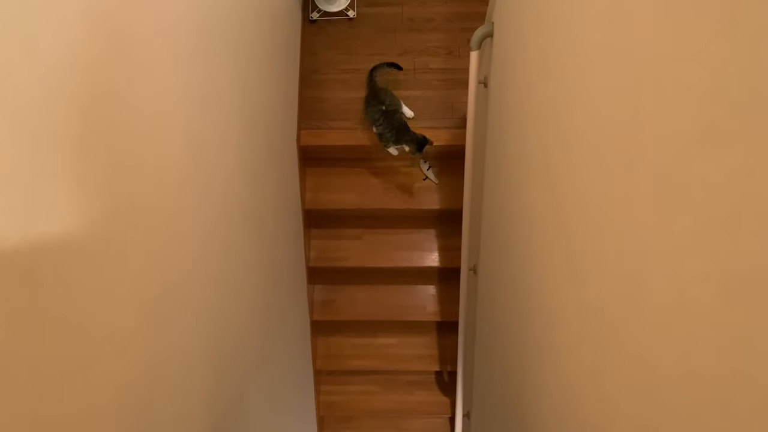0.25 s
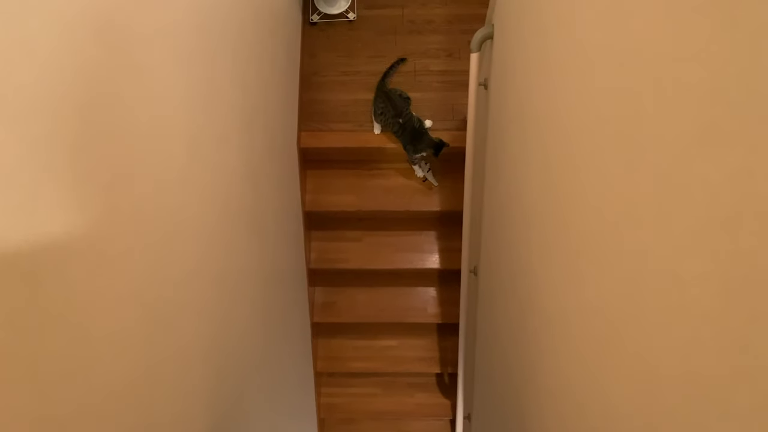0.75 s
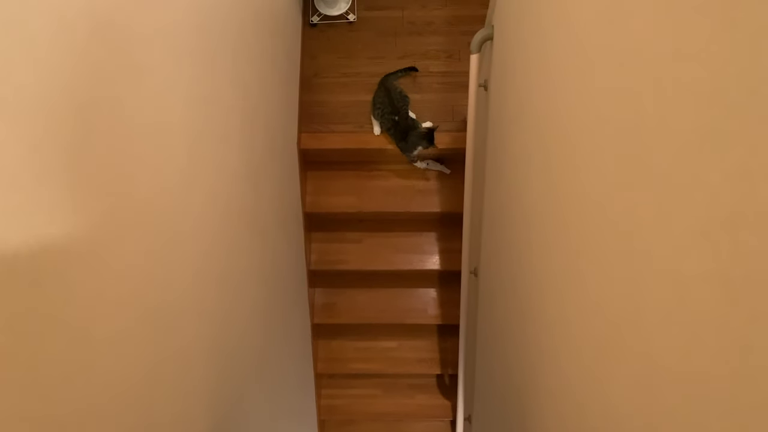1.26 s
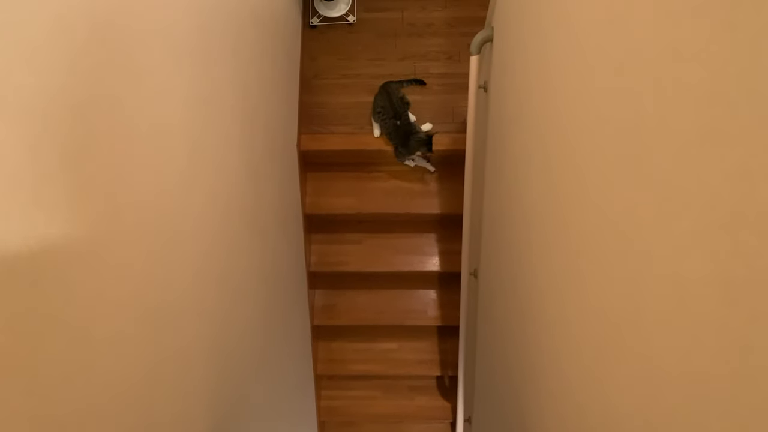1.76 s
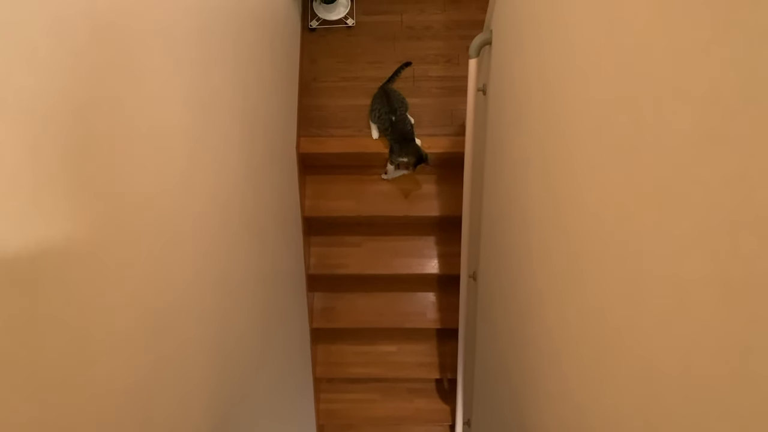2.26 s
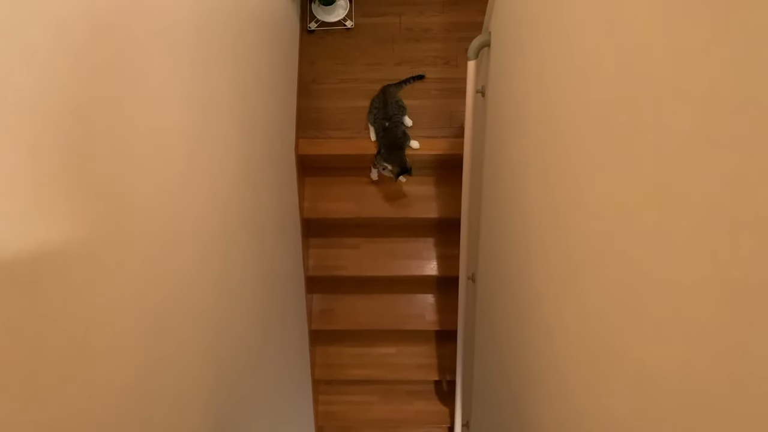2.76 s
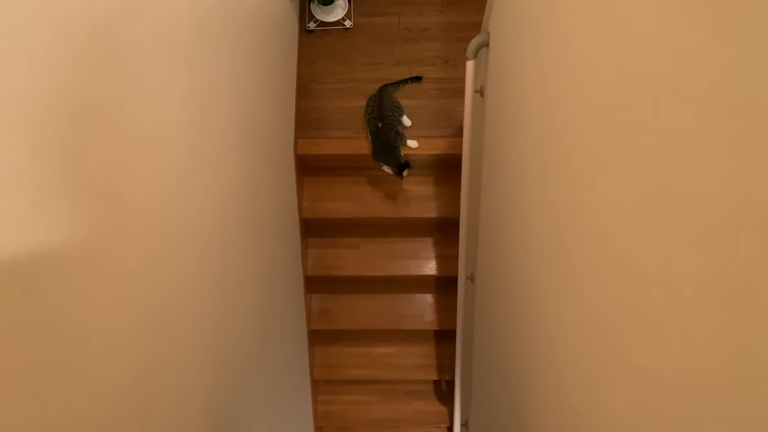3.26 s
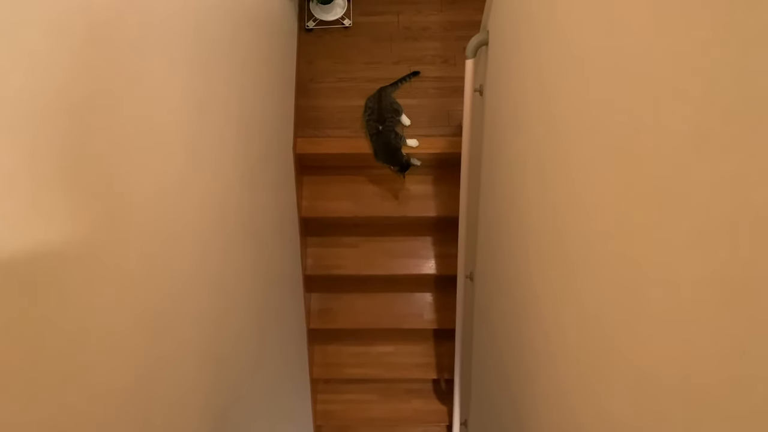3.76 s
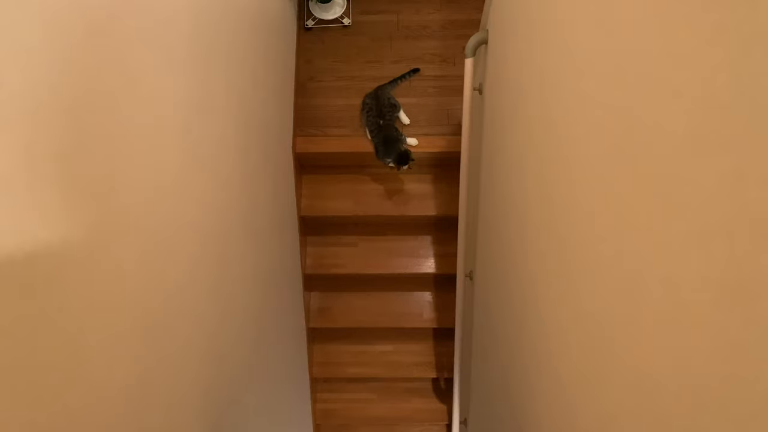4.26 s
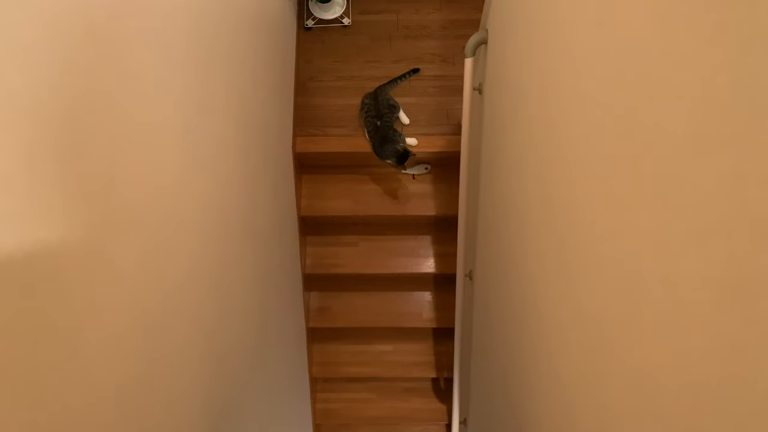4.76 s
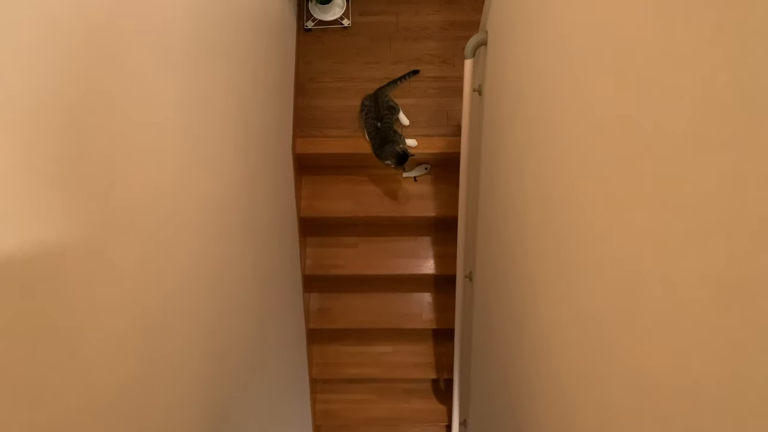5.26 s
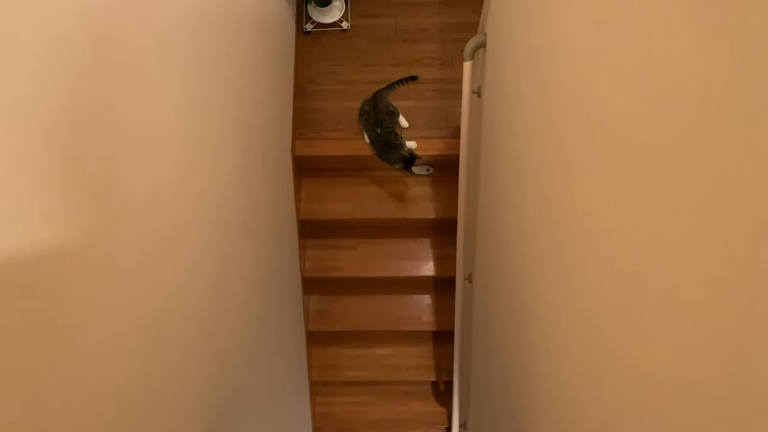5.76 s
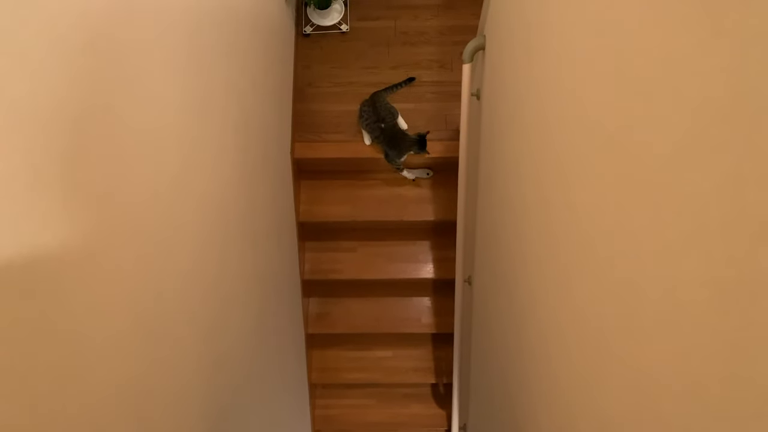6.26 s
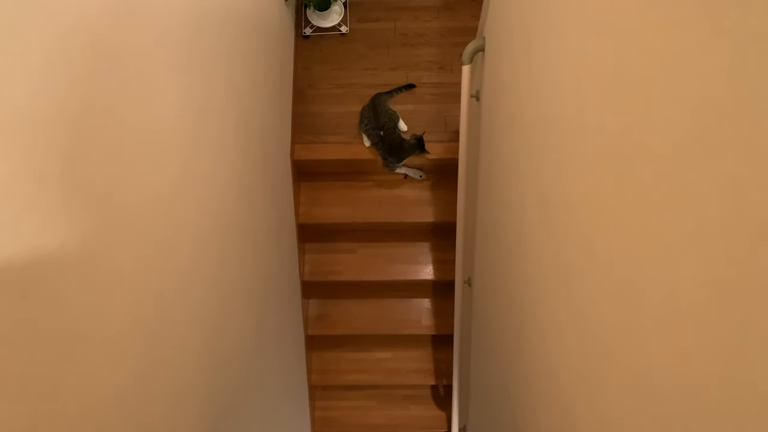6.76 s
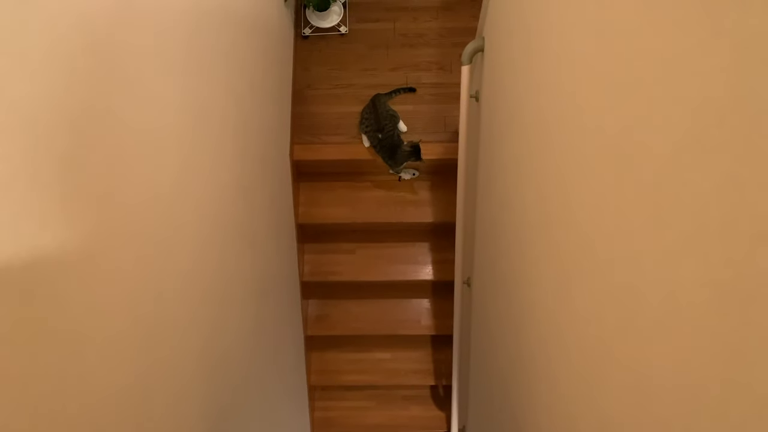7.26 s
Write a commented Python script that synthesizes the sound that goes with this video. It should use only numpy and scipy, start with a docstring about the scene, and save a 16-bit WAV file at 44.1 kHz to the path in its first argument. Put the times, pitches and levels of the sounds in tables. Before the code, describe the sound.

Quiet indoor air with a faint, low, wavering hum, heard from above a bare wooden stairwell. A soft low thump comes at 0.1 seconds, then a firmer hollow thump at 0.7 and a sharp toy clack at 0.8. The loudest, brightest clack cracks at 1.4, with an echo dying in about half a second. Dull taps and a slight scrape around 2.0 lead to a quick cluster of small knocks at 2.25 to 2.35, then lighter taps at 2.8 and 2.95. From 3.1 to 4.4 there are mostly faint rustling rubs, a slight slide and muffled bumps. A crisp knock lands at 4.8, followed by near quiet. A tight double clack comes at 5.85 to 5.97, strong and ringing, then moderate knocks at 6.5, 6.65 and 7.1, a faint dull tap at 7.3 and a last tiny rub.

```python
"""Hard clacks stand out over dull thumps and faint sliding: a cat bats a small hard toy about the top of
a wooden staircase, with the microphones above. Short chatters of contact ring the toy, and dull pushes
ring the modes of the hollow treads. Friction noise makes the toy slide, scrape and rustle.
The bare stairwell adds dense echoes to it all, over quiet air and the faint hum of an appliance."""
import sys
import numpy as np
from scipy import signal
from scipy.fft import rfft, irfft, next_fast_len
from scipy.io import wavfile
from scipy.ndimage import uniform_filter1d

SR = 44100
rng = np.random.default_rng(int(sys.argv[2]) if len(sys.argv) > 2 else 0)


def waveform_to_disk(signal):
    """Save audio, clipped to [-1, 1], as 16-bit WAV at the path in sys.argv[1]."""
    frames = np.transpose(np.atleast_2d(signal))
    scaled = np.clip(frames, -1, 1) * 32767
    samples = np.round(scaled).astype(np.int16)
    wavfile.write(sys.argv[1], SR, samples)


N = 331102  # length in samples

# The toy strikes the wood. Each row: start in seconds, relative level in dB, hardness in dB,
# hollowness in dB, contact time in seconds, favoured ring in Hz, lift of that ring in dB,
# room send in dB, relative level of the tread's answer in dB, depth of that answer in dB.
TOY_STRIKES = [(0.772, -25, -8, -10.5, 0.0018, 2480, 3, -1, -32.5, -10),
               (0.949, -40.5, -15.5, 12, 0.0017, 1255, 12, -2, -41, 7),
               (0.988, -56.5, -7.5, -12, .0025, 1370, -8, -2, -39.5, -1),
               (1.4194, -19, -7.5, -2, .0014, 1380, 1.5, -2, -26, -6.5),
               (1.637, -47, -10, 12, 0.0017, 1320, 7, -5, -35.5, -2),
               (2.016, -53, -13, 13.5, 0.0028, 1580, 0.5, 5, -49, 3),
               (2.119, -52.5, -41, 13, 0.0015, 1284, 5, -2, -66, -2),
               (2.227, -48, -12.5, -1, 0.0022, 1860, 1.5, 4, -53, 1),
               (2.255, -50, -8.5, -5, 0.0022, 1880, 6, 6, -60, -2),
               (2.2642, -33, -2, -6, 0.0024, 1910, 4, -1.5, -48, 0),
               (2.284, -39, -25, -15, 0.0022, 1940, 11, -8, -49, 5),
               (2.331, -30, -30.5, 0.5, 0.0016, 1980, 6, -3, -44.5, 0),
               (2.342, -42, -34, 10.5, 0.0012, 1625, 16, 1, -48.5, 5),
               (2.704, -58.5, -7, 11, 0.0041, 1480, 1.5, 1.5, -50, 1),
               (2.73, -47.5, -42.5, -4.5, .0018, 1400, 3, 4, -48.5, 0),
               (2.803, -32, -16, 9.5, 0.002, 1350, 0, 0, -44.5, 0),
               (2.951, -36, -17, 2, 0.0043, 2460, 4, -0.5, -42, -3),
               (3.462, -62, -6, 18.5, 0.0023, 1300, 5.5, -1.5, -47, 2),
               (3.553, -62, -8.5, 3, 0.0018, 1195, 13.5, 4, -70, -6),
               (4.021, -67, -17, 4.5, .0031, 1240, -1, 0, -70.5, 0.5),
               (4.639, -67, -13.5, 20.5, .005, 1150, 7, 0.5, -61.5, 1.5),
               (4.821, -34, -2.5, -1.5, 0.0016, 1870, 6, .5, -32.5, 6.5),
               (5.839, -46, -10.5, 1, 0.0031, 1320, 8, 3.5, -36.5, 0),
               (5.861, -32.5, -27, 2, 0.00095, 1490, 3, -0.5, -33, 0),
               (5.8649, -33, -2.5, 6.5, 0.0018, 2060, 3.5, -1.5, -26.5, -7),
               (5.9648, -22.5, -12, 3.5, 0.0025, 1556, 10.5, -3, -34, -8),
               (5.975, -30.5, -16, 8.5, 0.00091, 2280, 21, -5, -30, -10),
               (6.471, -35.5, -3.5, -9, 0.0017, 1450, 0, 2, -34.5, -4),
               (6.637, -38.5, -22, -5.5, 0.0023, 2280, 5, -6, -38, 4.5),
               (6.65, -39, -2.5, 9, 0.0011, 2250, 12.5, 0.5, -25.5, -5),
               (7.1209, -32.5, -5.5, -5.5, 0.002, 2400, 8, .5, -35.5, -5),
               (7.294, -51, -33, 10.5, 0.0055, 1190, 3, -5, -59.5, -1)]
# Resonances of the toy before each grip shifts them. Each row: centre in Hz, width in Hz, lift in dB.
TOY_RINGS = [(1331, 60, 4), (1455, 60, 3.5), (1590, 80, 3), (1785, 45, 3), (1875, 50, 6), (2235, 55, 5.5),
             (2401, 55, 6), (2590, 55, 7.5), (2745, 40, 7.5), (2950, 50, 3), (4570, 300, 5), (5100, 200, 3),
             (5380, 120, 4), (5550, 50, 5), (6330, 100, 4), (6757, 60, 8), (9300, 900, 3)]
# Broad colour of a clack. Each row: frequency in Hz, relative density in dB per Hz.
CLACK_COLOUR = [(150, -22.5), (400, -7.5), (570, -6.5), (700, -8.5), (950, -7), (1300, 1.5), (2500, -4.5),
                (3350, -2), (4000, 6), (5500, 1), (6800, 3), (7700, 4.5), (9000, 4.5), (10000, 3.5),
                (12000, 9), (13300, 0.5), (14500, -16)]
# A harder contact brightens the clack. Each row: frequency in Hz, dB at hardness 0,
# dB gained per dB of hardness.
HARDNESS_COLOUR = [(1492, -1, 0), (2390, 1.5, 0.2669), (6140, 1.5, 1.3544), (13000, -12.5, 2.16)]
HOLLOW_HZ = 745  # a hollow blow gains body from here down
# The room hears the toy from all sides, which flattens and widens the favoured ring.
ROOM_SPOT_SHARE, ROOM_SPOT_HZ = .65, 380


def toy(level_db=38.0, rise_s=0.058, ring_width_hz=260, detune=0.0098, uneven_db=0.5, size=4096):
    """Each clack is a short chatter ringing the toy; returns the direct sound and what feeds the room."""
    hz = bins(size)
    direct, room_send = np.zeros(N), np.zeros(N)
    # Paw and wood load the toy differently each time.
    grips = 1 + detune * rng.standard_normal((len(TOY_STRIKES), len(TOY_RINGS)))
    # A slight random unevenness in the colour of each clack.
    unevenness = unit(uniform_filter1d(rng.standard_normal((len(TOY_STRIKES), len(hz))), size=17))
    for strike, grip, uneven in zip(TOY_STRIKES, grips, unevenness):
        s, db, hard_db, hollow_db, contact_s, ring_hz, ring_db, send_db, *_ = strike
        colour = [(HOLLOW_HZ, hollow_db)]
        colour += [(f, base_db + slope * hard_db) for f, base_db, slope in HARDNESS_COLOUR]
        body_db = sum(peak_db * bump(hz, f * g, width) for (f, width, peak_db), g in zip(TOY_RINGS, grip))
        body_db += db + level_db + read(CLACK_COLOUR, hz) + read(colour, hz)
        # The spot that is struck favours one ring.
        spot_db = ring_db * bump(hz, ring_hz, ring_width_hz) + uneven_db * uneven
        spread_db = ROOM_SPOT_SHARE * ring_db * bump(hz, ring_hz, ROOM_SPOT_HZ)
        clack = signal.fftconvolve(chatter(rise_s, contact_s), causal(body_db + spot_db))
        all_round = signal.fftconvolve(chatter(rise_s, contact_s, order=9), causal(body_db + spread_db))
        add(direct, s, near_echoes(clack))
        add(room_send, s, all_round * amp(send_db))
    return direct, room_send


# First echoes off risers and side walls. Each row: nominal delay in seconds, relative level in dB.
FIRST_ECHOES = [(.0019, 0), (.004, -4.5), (.0069, -11), (.0098, -20), (0.015, -6.5)]


def near_echoes(x, scatter=.15):
    """Nearby wood and walls thicken a clack; their distances vary at random from clack to clack."""
    taps = np.zeros(SR // 40)
    taps[0] = 1
    for delay_s, db in FIRST_ECHOES:
        stretch = 1 + scatter * rng.uniform(-1, 1)
        add(taps, delay_s * stretch, [amp(db) * rng.choice([-1, 1])])
    return signal.fftconvolve(x, taps / np.linalg.norm(taps))


def chatter(rise_s, fall_s, size=4096, order=35):
    """A short burst of tiny contacts, nearly even in energy at all pitches (a low order is more even)."""
    t = np.arange(size) / SR
    shape = (1 - np.exp(-t / rise_s)) ** 2 * np.exp(-t / fall_s)
    spectrum = rfft(rng.standard_normal(size) * shape)
    spectrum /= np.sqrt(uniform_filter1d(abs(spectrum) ** 2, size=order))
    return irfft(spectrum, size)[:size // 2]


# Modes of a hollow tread, varied from blow to blow. Each row: nominal frequency in Hz,
# relative level in dB, decay by 60 dB in seconds.
TREAD_MODES = [(52.08, -20.5, 0.16), (77.4, -16, 1), (114.6, -12.5, 0.55), (156.7, -7.5, 0.2),
               (192.5, -2, .14), (241.6, -5, 0.072), (273.6, -9, 0.14), (307.4, 0, 0.14), (346.6, -5, 0.12),
               (432, 2.5, 0.03), (566, -4.5, 0.037), (557, 1, 0.063), (604.7, -4, 0.068), (773, -10, 0.052)]
# Dull push on the wood. Each row: frequency in Hz, relative density in dB per Hz.
PUSH_COLOUR = [(30, -35.5), (70, -11.5), (150, 2), (300, 0), (430, 3.5), (580, -2), (850, -10), (1200, -21),
               (2500, -56), (5000, -88)]


def treads(level_db=7.5, push_db=29, rise_s=0.0053, softening=0.32, detune=0.025, size=8192):
    """Each blow is a dull push that rings the modes of a hollow tread, a little differently each time."""
    t = np.arange(SR // 2) / SR
    direct, room_send = np.zeros(N), np.zeros(N)
    blows = tread_blows()
    hz, mode_db, t60 = np.transpose(TREAD_MODES)[:, :, None]
    variations = rng.uniform(-1, 1, (len(blows), 2, len(TREAD_MODES), 1))
    for (s, db, colour, send_db, press_s), (shift, phase) in zip(blows, variations):
        contact_s = rise_s * amp(-softening * (db + 38.5))  # gentle blows press in more slowly
        rings = np.sin(2 * np.pi * hz * (1 + detune * shift) * t + np.pi * phase)
        rings *= np.exp(-np.log(1000) * t / t60)
        thump = (amp(level_db + mode_db + read(colour, hz)) * rings).sum(0)
        thump *= 1 - np.exp(-(t / contact_s) ** 2)
        push = causal(push_db + read(PUSH_COLOUR, bins(size)) + read(colour, bins(size)))
        add(thump, 0, signal.fftconvolve(chatter(contact_s, press_s, size=size), push))
        add(direct, s, thump * amp(db))
        add(room_send, s, thump * amp(db + send_db))
    return direct, room_send


# Dull thumps on a tread, from a paw, the cat's weight or the landing toy. Each row: start in seconds,
# relative level in dB, centre of the push in Hz, press time in seconds.
DULL_THUMPS = [(0.073, -35, 142, .011), (0.072, -61, 490, 0.0073), (0.272, -45.5, 165, 0.012),
               (0.275, -51, 760, 0.0098), (0.593, -53.5, 199, .011), (0.651, -41, 190, .005),
               (0.681, -22, 328, .006), (0.697, -28, 235, 0.0072), (0.753, -34.5, 293, .009),
               (0.921, -41.5, 315, .011), (1.636, -38.5, 190, .008), (1.975, -46, 410, 0.0086),
               (2.098, -40.5, 476, .011), (2.119, -45, 514, 0.012), (2.121, -42.5, 272, 0.009),
               (2.216, -36, 152, 0.0091), (2.249, -43, 383, .008), (2.721, -45, 140, .011),
               (2.966, -42.5, 190, .011), (3.421, -47, 340, .009), (3.45, -44, 190, 0.0074),
               (3.462, -46, 563, 0.0074), (3.8, -53, 165, .011), (4.276, -57.5, 236.6, .011),
               (4.568, -50.5, 220, 0.0101), (4.661, -45.5, 315, 0.012), (4.68, -50.5, 321, .013),
               (4.67, -53.5, 600, .016), (4.824, -47, 180, .008), (5.868, -40.5, 203, 0.0095),
               (6.651, -41, 185, .008), (7.299, -41.5, 212, 0.015)]
# The light toy drives a tread in a narrow range. Each row: frequency in Hz, gain in dB.
LANDING_COLOUR = [(120, -23), (205, -14), (310, -1), (520, -14.5)]
LANDING_LAG_S, LANDING_PRESS_S, LANDING_SEND_DB = .003, .009, -1.5
DEPTH_HZ = 230  # a deep landing gains bass below this
PUSH_FALL_DB = 9.5  # loss one octave from the centre; it grows with the square of the distance
DULLING_DB = 4  # further loss an octave above the centre, which smothers the highs
THUMP_SEND_DB = -0.5  # share of a dull thump that feeds the room


def tread_blows(low_hz=100, high_hz=900, count=12):
    """Answers to the clacks, then dull thumps, as (s, dB, colour, room send dB, press time s)."""
    hz = np.geomspace(low_hz, high_hz, count)
    bass = 1 / (1 + (hz / DEPTH_HZ) ** 6)
    blows = []
    for s, *_, db, depth_db in TOY_STRIKES:
        colour = list(zip(hz, read(LANDING_COLOUR, hz) + depth_db * bass))
        blows.append((s + LANDING_LAG_S, db, colour, LANDING_SEND_DB, LANDING_PRESS_S))
    for s, db, centre_hz, press_s in DULL_THUMPS:
        octaves = np.log2(hz / centre_hz)
        gain_db = -PUSH_FALL_DB * octaves ** 2 - DULLING_DB * np.maximum(octaves, 0) ** 3
        blows.append((s, db, list(zip(hz, gain_db)), THUMP_SEND_DB, press_s))
    return blows


# The toy slides over the wood. Each row: start in seconds, length in seconds, relative level in dB,
# starting ring in Hz, final ring in Hz, width in Hz.
TOY_SLIDES = [(0.026, 0.1, -67.5, 1626, 1516, 726), (0.11, 0.22, -65.5, 1970, 2200, 201),
              (0.578, 0.1, -66.5, 2140, 2285, 500), (1.13, 0.21, -61.5, 2036, 1880, 171),
              (3.858, 0.26, -63, 2148, 2312, 350), (5.299, 0.16, -80, 2135, 2150, 300.5)]


def sliding(level_db=-3.0, second_ratio=0.95, second_db=-5.0, catch_db=0.5):
    """The sliding toy sings faintly: friction feeds a pair of close rings that glide as it turns."""
    t, out = np.arange(N) / SR, np.zeros(N)
    size = next_fast_len(N)
    for s, length_s, db, start_hz, end_hz, width_hz in TOY_SLIDES:
        ring_hz = np.interp(t, [s, s + length_s], [start_hz, end_hz])
        phase = 2 * np.pi * np.cumsum(ring_hz) / SR
        # Complex noise around 0 Hz, to be carried up to each ring.
        spectrum = np.fft.fft(rng.standard_normal((N, 2)) @ [1, 1j], size)
        friction = np.fft.ifft(spectrum * bump(np.fft.fftfreq(size, 1 / SR), 0, width_hz))[:N]
        pair = np.exp(1j * phase) + amp(second_db) * np.exp(1j * second_ratio * phase)
        swell = np.sin(np.pi * np.clip((t - s) / length_s, 0, 1))
        out += amp(db + level_db) * swell * unit((friction * pair).real)
    catches = unit(uniform_filter1d(rng.standard_normal(N), size=900))
    return out * amp(catch_db * catches)


# Strokes of the toy rubbed or chewed. Each row: start in seconds, time to the start of the release in
# seconds, relative scrape level in dB, relative rustle level in dB.
RUB_STROKES = [(0.483, 0.16, -68, -80.5), (0.64, 0.1, -69, -68), (0.753, 0.03, -47.5, -58),
               (1.94, 0.087, -65, -64.5), (2.005, 0.029, -49.5, -60.5), (3.137, 0.056, -75, -65),
               (3.214, 0.055, -60.5, -55), (3.283, 0.027, -62.5, -54.5), (3.429, 0.038, -61.5, -72),
               (3.535, 0.062, -62.5, -64.5), (3.707, 0.083, -61, -65.5), (3.838, 0.061, -62, -69.5),
               (3.92, 0.06, -66.5, -71.5), (3.985, 0.059, -59.5, -75.5), (4.268, 0.05, -70, -79.5),
               (4.367, 0.058, -73.5, -79), (5.682, 0.05, -68.5, -80.5), (5.756, 0.096, -60.5, -68.5),
               (7.455, 0.053, -69, -65.5)]
# Low scrape of the rubbed toy. Each row: frequency in Hz, relative density in dB per Hz.
SCRAPE_COLOUR = [(300, -4), (800, -2), (1300, 1), (2300, 1.5), (3200, -18.5), (5000, -45.5)]
# High rustle of the rubbed toy. Each row: frequency in Hz, relative density in dB per Hz.
RUSTLE_COLOUR = [(2000, -14), (3500, -5.5), (6500, -4), (9000, -14.5), (13000, -12.5), (14500, -31)]
RUB_ATTACK_S, RUB_RELEASE_S = 0.016, 0.016


def rubbing(scrape_db=-3, rustle_db=-2, grain_db=1.5, catch_db=0.5):
    """Grainy friction on wood, fur and teeth: each stroke swells, catches unevenly and dies away."""
    t, out = np.arange(N) / SR, np.zeros(N)
    scrape, rustle = noise(SCRAPE_COLOUR), noise(RUSTLE_COLOUR)
    for s, length_s, low_db, high_db in RUB_STROKES:
        swell = np.clip((t - s) / RUB_ATTACK_S, 0, 1)
        release = np.exp(-np.clip(t - s - length_s, 0, 1) / RUB_RELEASE_S)
        friction = amp(scrape_db + low_db) * scrape + amp(rustle_db + high_db) * rustle
        out += swell * release * friction
    grains = unit(uniform_filter1d(rng.standard_normal(N), size=150))
    catches = unit(uniform_filter1d(rng.standard_normal(N), size=900))
    return out * unit(amp(grain_db * grains + catch_db * catches))


# Decay of the stairwell. Each row: frequency in Hz, decay by 60 dB in seconds.
STAIRWELL_T60 = [(100, .6), (300, .7), (700, .6), (1400, .6), (1900, .68), (2600, .6), (5000, .46),
                 (8000, .43), (13000, .35)]
# Strength of the stairwell's tail. Each row: frequency in Hz, gain in dB.
STAIRWELL_DB = [(100, -1.5), (300, -8), (560, 0), (800, 5), (1400, 1), (2500, 3.5), (4000, -3.5),
                (6500, -1.5), (9000, -4.5), (13000, -3.5)]


def stairwell(x, gap_s=0.0014, build_s=0.0012, count=3):
    """Dense echoes between bare walls; the pattern turns slowly and steadily among three random sets."""
    out = np.zeros((2, N))
    for k in range(count):
        # Sparse random echoes, about 5000 a second, for each microphone.
        taps = ports(rng.standard_normal((2, SR)) * (rng.random(SR) < 5000 / SR))
        hz, t, z = signal.stft(unit(taps), SR, nperseg=256)
        t60 = read(STAIRWELL_T60, hz)[:, None]
        decay = np.exp(-np.log(1000) * t / t60)
        even_energy = np.sqrt(2 * np.log(1000) / t60 / SR)  # a longer decay brings no extra energy
        z *= amp(read(STAIRWELL_DB, hz))[:, None] * decay * even_energy
        tail = signal.istft(z, SR, nperseg=256)[1][:, :SR]
        tail *= 1 - np.exp(-np.maximum(np.arange(SR) / SR - gap_s, 0) / build_s)
        # The sets fade into one another at a steady total power.
        share = np.cos(np.pi * (np.arange(N) / SR + k / count)) * np.sqrt(2 / count)
        out += signal.fftconvolve((x * share)[None], tail, axes=1)[:, :N]
    return out


# Colour of the air of the house. Each row: frequency in Hz, relative density in dB per Hz.
AIR_COLOUR = [(20, -42), (30, -22), (45, -6.5), (95, -4), (135, -13), (200, -17), (280, -19.5), (450, -28),
              (650, -31), (900, -33), (1500, -29), (2300, -29.5), (3000, -37.5), (4500, -37), (7000, -39.5),
              (12000, -38.5), (14500, -43)]
AIR_DB, STIR_DB = -64.6, .8  # middle level and its rms wander
HUM_HZ, HUM_DB, HUM_WAVER = 100.2, -64.5, .45  # waver: rms share of the hum's amplitude


def background():
    """Air of the house, slowly stirring, and the wavering hum of an appliance."""
    slow = [(1, 0), (6, -6), (20, -50), (200, -120)]  # Hz, relative dB per Hz
    drift, stir = noise(slow), noise(slow)
    tone = np.sin(2 * np.pi * HUM_HZ * np.arange(N) / SR)
    hum = amp(HUM_DB) * unit((1 + HUM_WAVER * drift) * tone)
    air = ports(np.array([noise(AIR_COLOUR), noise(AIR_COLOUR)]))
    return hum + amp(AIR_DB + STIR_DB * stir) * air


# Likeness of the two microphones in diffuse sound. Each row: frequency in Hz, likeness from 0 to 1.
MIC_LIKENESS = [(100, .82), (350, .85), (700, .4), (1500, .25), (2600, .2), (5000, .55), (7000, .72),
                (12000, .75)]


def ports(pair):
    """Makes two unrelated signals as alike as diffuse sound is at two close microphones."""
    size = pair.shape[1]
    a, b = rfft(pair)
    same = np.clip(read(MIC_LIKENESS, bins(size)), 0, .995)
    return irfft(np.array([a, same * a + np.sqrt(1 - same ** 2) * b]), size)


def amp(db):
    """Decibels to gain."""
    return 10 ** (np.asarray(db) / 20)


def unit(x):
    """Scales to rms 1."""
    return x / np.sqrt(np.mean(x ** 2) + 1e-20)


def read(points, hz):
    """Joins (Hz, value) points on a log-frequency axis."""
    f, value = np.transpose(points)
    return np.interp(np.log(hz + 1), np.log(f + 1), value)


def add(mix, s, sound):
    """Mixes a sound in at time s."""
    part = mix[max(round(s * SR), 0):][:len(sound)]
    part += sound[:len(part)]


def bins(size):
    """Frequencies of a real spectrum."""
    return np.fft.rfftfreq(size, 1 / SR)


def bump(hz, centre_hz, width_hz):
    """Bell shape of a resonance, height 1."""
    return 1 / (1 + (2 * (hz - centre_hz) / width_hz) ** 2)


def noise(colour):
    """Noise of rms 1 with the given colour."""
    white = rfft(rng.standard_normal(N))
    return unit(irfft(white * amp(read(colour, bins(N))), N))


def causal(db):
    """Minimum-phase response: the promptest ringing that has this gain curve."""
    log_gain = np.log(amp(np.r_[db, db[-2:0:-1]]))
    return np.fft.ifft(np.exp(np.conj(signal.hilbert(log_gain)))).real


# How far the left microphone leads the right. Each row: frequency in Hz, phase in radians.
LEFT_LEAD = [(0, 0), (400, 0), (900, -.2), (2300, .4), (2800, .9), (3300, 2.9), (4500, 2.8), (6500, 5.9),
             (7500, 6.7), (10000, 9.4), (13000, 12.7), (15000, 14.5)]


def scene():
    """Toy and treads in the stairwell; the treble reaches the left microphone first."""
    clacks, clack_send = toy()
    thumps, thump_send = treads()
    rub = rubbing() + sliding()
    room = stairwell(clack_send + thump_send + rub)
    left, right = clacks + thumps + rub + room + background()
    lead = np.interp(bins(N), *np.transpose(LEFT_LEAD))
    right = irfft(rfft(right) * np.exp(-1j * lead), N)
    return np.array([left, right])


EDGE_HZ = 14200


def record(dry):
    """The recorder's band limit: a low-pass filter that removes the highest treble."""
    low_pass = signal.firwin(255, EDGE_HZ, window=("kaiser", 8), fs=SR)
    return signal.oaconvolve(dry, low_pass[None], "same")


dry = scene()
out = record(dry)
waveform_to_disk(out)
```